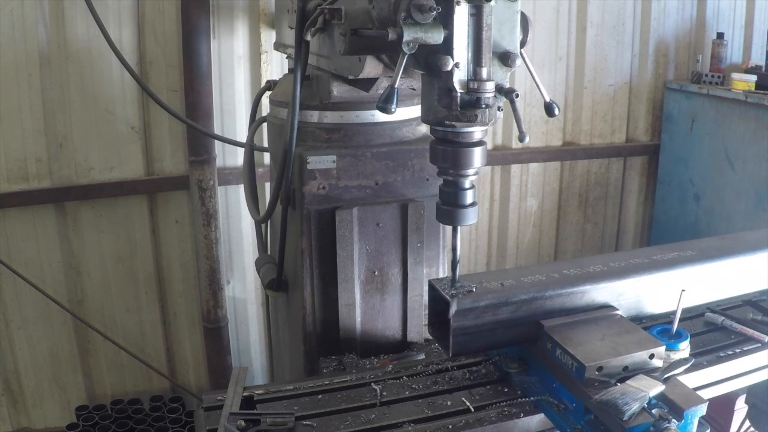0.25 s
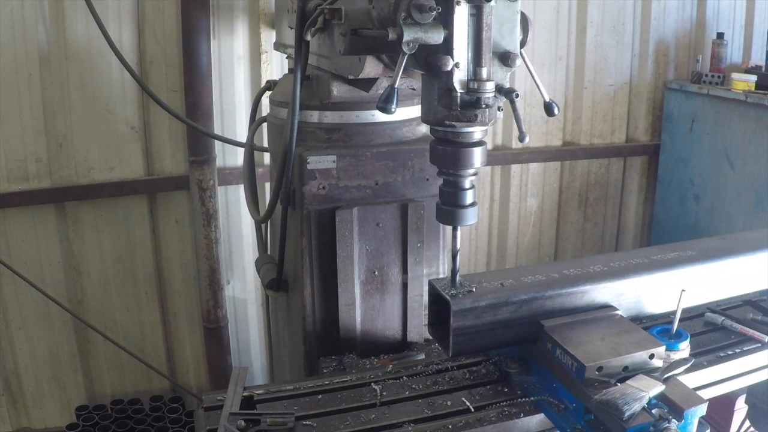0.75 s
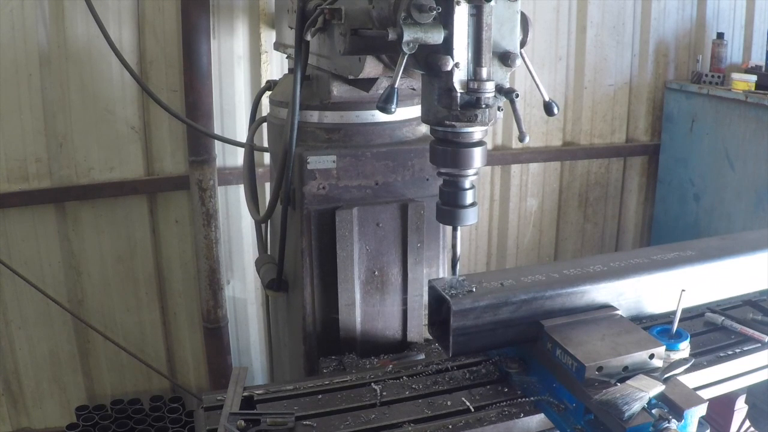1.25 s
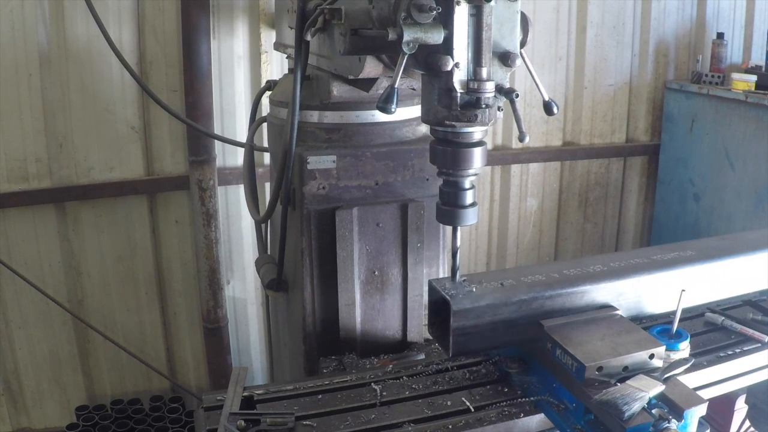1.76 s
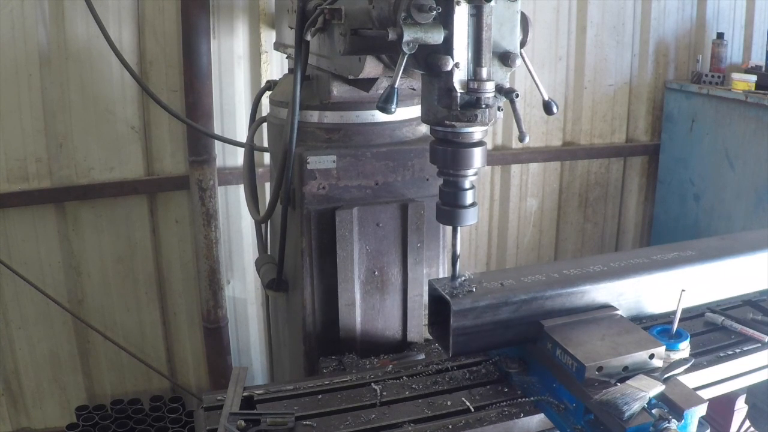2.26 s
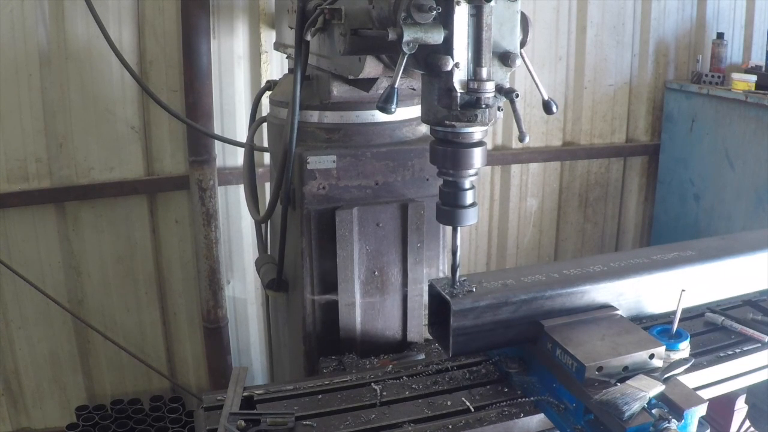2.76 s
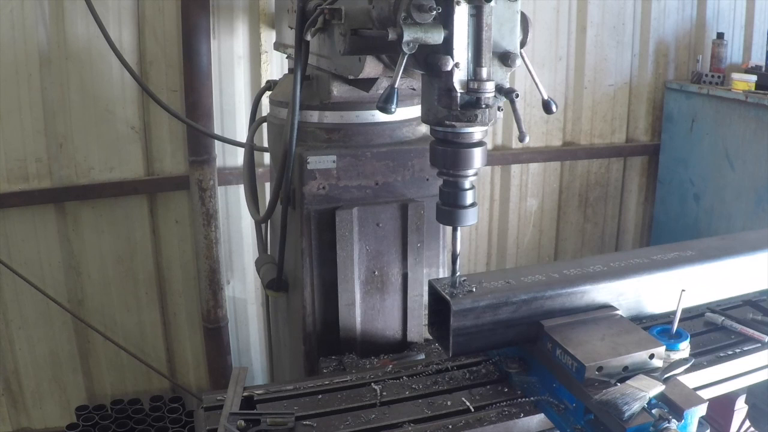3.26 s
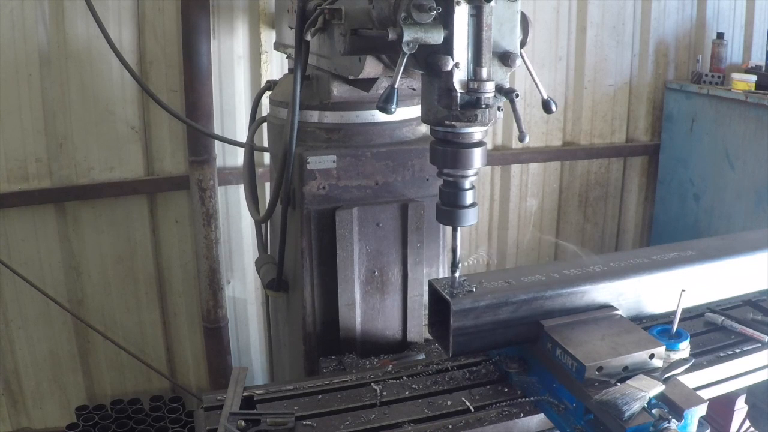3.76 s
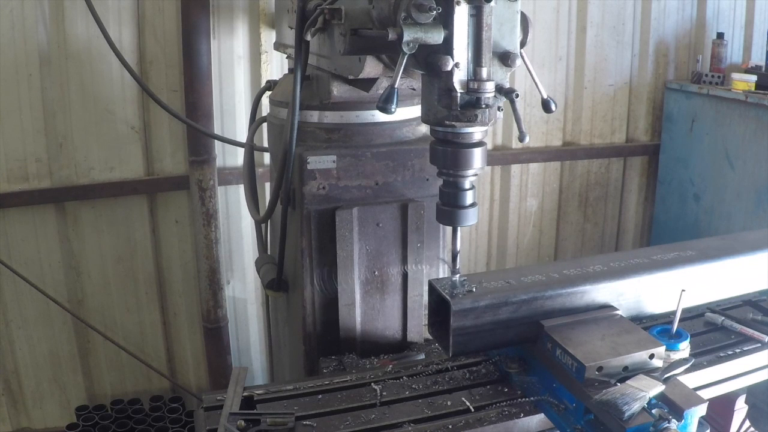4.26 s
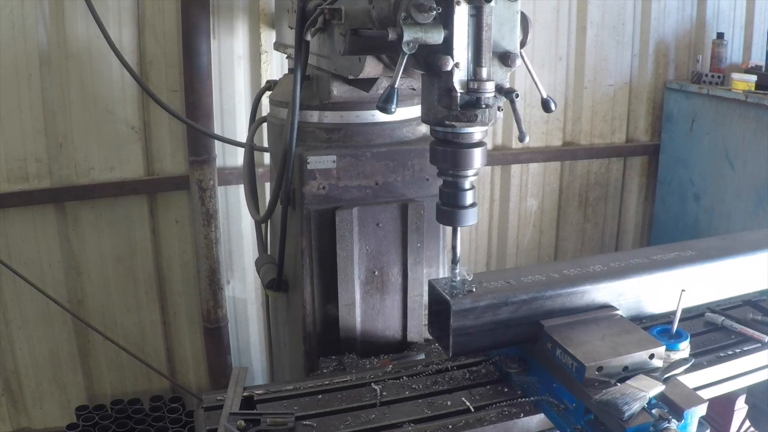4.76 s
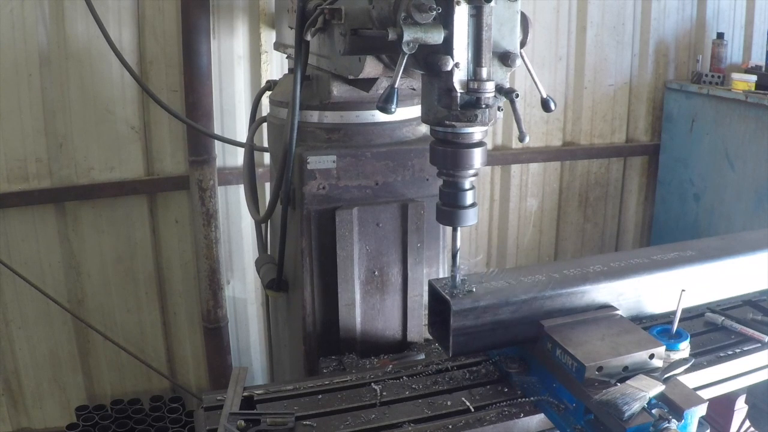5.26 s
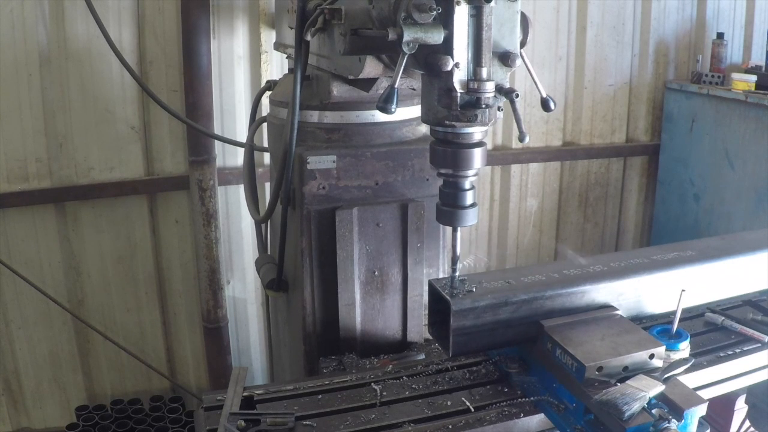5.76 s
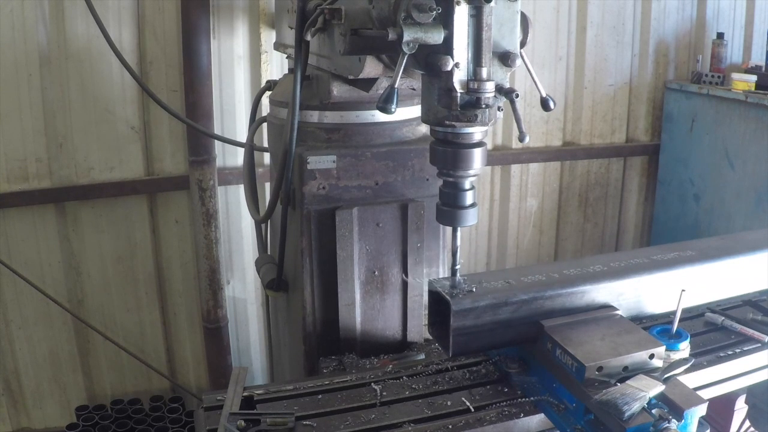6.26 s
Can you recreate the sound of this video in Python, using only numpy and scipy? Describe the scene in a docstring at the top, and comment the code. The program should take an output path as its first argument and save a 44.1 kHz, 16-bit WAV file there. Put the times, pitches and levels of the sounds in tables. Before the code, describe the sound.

A milling machine drills a steel tube with a steady, piercing gear whine over motor hum, low rumble and a faint cutting hiss.

```python
"""The gears of a milling machine whine as it drills a square steel tube: sine harmonics of the tooth rate, with
side lines from the spindle's run-out. The drill's lips hiss in the cut: shaped noise, throbbing with each turn.
Motor and a faster pulley shaft hum as stacks of sine orders; tube, covers and panels ring as resonated noise.
The castings rumble as low shaped noise. A sheet-metal shed adds short echoes to the hiss and the rumble."""
import sys
import numpy as np
from scipy import signal
from scipy.fft import rfft, irfft, next_fast_len
from scipy.io import wavfile

SR = 44100
rng = np.random.default_rng(int(sys.argv[2]) if len(sys.argv) > 2 else 0)


def file_out(sig):
    """Save sig as 16-bit WAV at sys.argv[1]."""
    # one column per channel
    cols = np.atleast_2d(sig).T
    # limit, then scale
    lim = np.clip(cols, -1, 1)
    pcm = np.round(lim * 32767).astype(np.int16)
    wavfile.write(sys.argv[1], SR, pcm)


N = 286641
TIME = np.arange(N) / SR   # s

# rumble of the castings, before its level curve: (frequency [Hz], density [dB per Hz])
RUMBLE_SPECTRUM = [(25, -64.5), (60, -60), (120, -59), (200, -56.5), (350, -56), (600, -55), (850, -54.5),
                   (1050, -52.5), (1500, -53), (1700, -58), (2000, -67.5), (2400, -72.5), (3100, -74),
                   (4000, -85)]
# level curve of the rumble: (time [s], gain [dB])
RUMBLE_GAIN = [(0.0, -1.5), (6.5, 0.5)]
# unsteady rings of tube and covers:
# (frequency [Hz], width of each filter pass [Hz], start level [dB rms], end level [dB rms])
TUBE_AND_COVER_RINGS = [(154.1, 2, -49, -49), (392.3, 2, -48, -48), (591.8, 3, -42, -39),
                        (601.6, 2, -43, -40), (696.1, 2, -45, -45), (800.8, 3, -47, -46),
                        (1131.2, 2, -46, -44), (1194.4, 2, -46, -44), (1490.2, 4, -46, -41),
                        (1507.7, 3, -40, -34), (1373.5, 2, -50, -42), (1479, 3, -50, -41),
                        (1458.2, 3, -47, -42)]
# broad panel resonances that grow or fade as the hole deepens:
# (frequency [Hz], width of each filter pass [Hz], start level [dB rms], end level [dB rms])
PANEL_RINGS = [(110, 150, -43, -49.5), (309, 70, -45.5, -39.5), (612, 100, -37, -33), (1004, 68, -28, -40),
               (1303, 46, -43.5, -45.5), (1483, 120, -37.5, -35), (2928, 240, -54, -50)]
# turning rate of the pulley shaft: (start [Hz], end [Hz])
PULLEY_RATE = (47.245, 47.32)
# pulley shaft hum, before drift: (order [multiple of shaft rate], start level [dB rms], end level [dB rms])
PULLEY_ORDERS = [(1, -52.7, -53.1), (2, -44.9, -57.7), (3, -48.9, -49.7), (4, -35.4, -33.8),
                 (5, -49.9, -44.5), (6, -37.2, -34.5), (7, -44.8, -44.2), (8, -40.3, -42.3),
                 (9, -52.0, -52.7), (10, -39.6, -38.9), (11, -41.3, -39.4), (12, -35.3, -29.6),
                 (13, -42.0, -39.6), (14, -29.0, -27.6), (15, -39.2, -38.4), (16, -44.4, -38.2),
                 (18, -37.6, -40.7), (20, -35.9, -28.7), (22, -43.8, -42.6), (23, -38.8, -40.7),
                 (32, -42.4, -36.9)]
# motor hum, before drift: (order [multiple of motor rate], level [dB rms])
MOTOR_ORDERS = [(1, -51), (2, -48), (4, -48), (6, -44), (7, -50), (8, -42), (9, -41), (11, -42)]
# colour of the cutting hiss, only its shape counts: (frequency [Hz], relative density [dB per Hz])
HISS_SPECTRUM = [(3300, -80), (3800, -80), (4100, -82), (4600, -81), (5100, -81.5), (5800, -81),
                 (6800, -86), (7300, -90.2), (7800, -92.7), (8300, -97.6), (9000, -98.3), (10000, -98.5),
                 (11300, -103.7), (15060, -105)]
# resonances in the hiss: (frequency [Hz], width [Hz], boost [dB])
HISS_RESONANCES = [(4670, 60, 3), (5700, 200, 2.5), (6200, 100, 2), (6800, 80, 3), (9630, 200, 3.5),
                   (10350, 150, 3), (10900, 200, 2.5), (14000, 300, 2)]
# the feed; the load eases as the hole deepens and the spindle speeds up a little:
# (time [s], teeth meshing per second [Hz], load on the gears [0-1])
FEED_CURVE = [(0.0, 516.57, 1.0), (2.1, 516.75, 1.0), (2.9, 516.97, .72), (3.7, 516.94, .28),
              (6.5, 517.13, 0.0)]
# gear whine: (mesh harmonic [number], unloaded level [dB rms], full-load level [dB rms], slow waver [dB])
WHINE_HARMONICS = [(1, -32.7, -32.9, .5), (2, -39.5, -31.1, 1.0), (3, -24.2, -17.8, .3),
                   (4, -48.0, -48.5, 1.5), (5, -59.0, -50.2, 1.0), (6, -55.5, -52.5, 1.8)]
# run-out of the spindle gear, before drift:
# (mesh harmonic [number], offset [spindle orders], start level [dB rms], end level [dB rms])
RUNOUT_LINES = [(1, -1, -43, -49), (1, 1, -44, -46), (2, -4, -44, -42), (2, -3, -44, -47),
                (2, -2, -32, -37), (2, 1, -39, -43), (2, 2, -39, -40), (2, 3, -50, -43), (3, -1, -42, -49),
                (3, 1, -44, -50)]
# lead of the side lines; none sways the level, a quarter sways the pitch:
# (harmonic 1 [cycles], harmonic 2 [cycles], harmonic 3 [cycles])
SIDE_LINE_LEAD = (-.27, .17, 0)

MOTOR_HZ = 29.77
MESHES_PER_TURN = 93
HIGH_SPOT_TURNS, BITE_TURNS = .77, .1   # spindle angles where the gear and the drill's lips press hardest
HISS_DB = -45.5       # rms, before throb and flutter
CUTOFF_HZ = 15250     # the top is 50 dB down from here


def from_db(db):
    """Turn decibels into an amplitude factor."""
    return 10 ** (np.asarray(db) / 20)


def rms_one(x):
    """Scale a signal to an rms of 1."""
    return x / np.sqrt(np.mean(x ** 2) + 1e-20)


def in_time(rows):
    """Draw each column of a breakpoint table as a curve over the scene."""
    seconds, *columns = np.transpose(rows)
    return [np.interp(TIME, seconds, column) for column in columns]


def glide(start, end):
    """Straight line from the first sample to the last."""
    return start + (end - start) * TIME / TIME[-1]


def drift(rate_hz):
    """Slow random wander of spread 1: coarse noise through a double one-pole low-pass."""
    step, warm_up = 40, 2000   # samples per coarse point, coarse points dropped
    pole = np.exp(-2 * np.pi * rate_hz * step / SR)
    noise = rng.standard_normal(N // step + warm_up + 2)
    slow = signal.lfilter([1], [1, -2 * pole, pole * pole], noise)[warm_up:]
    return np.interp(np.arange(N) / step, np.arange(len(slow)), rms_one(slow - slow.mean()))


def tone(turns, level_db):
    """A sine of the given rms level along a running count of cycles."""
    return np.sqrt(2) * from_db(level_db) * np.sin(2 * np.pi * turns)


def coloured_noise(spectrum, peaks=()):
    """Noise whose power per Hz follows the table, lifted around each resonance."""
    size = next_fast_len(N)
    hz = np.maximum(np.arange(size // 2 + 1) * SR / size, 1)
    table_hz, table_db = np.transpose(spectrum)
    level_db = np.interp(np.log(hz), np.log(table_hz), table_db, right=-200)
    for centre_hz, width_hz, boost_db in peaks:
        level_db = level_db + boost_db / (1 + (2 * (hz - centre_hz) / width_hz) ** 2)
    # white noise of 0 dB per Hz, then coloured
    white = rfft(rng.standard_normal(size)) * np.sqrt(SR / 2)
    return irfft(white * from_db(level_db), size)[:N]


def shed(x, wet_db):
    """A scatter of echoes off the walls puts fine ripples into the spectrum; power is kept."""
    out = x.copy()
    lags = rng.uniform(.004, .04, size=10)   # s
    signs = rng.choice([-1, 1], size=10)
    for lag, sign in zip(lags, signs):
        echo_db = wet_db - 150 * lag   # later echoes are weaker
        out += sign * from_db(echo_db) * np.roll(x, int(lag * SR))
    return out * np.std(x) / np.std(out)


def castings(bite_db):
    """Low noise of the heavy castings, swelling slightly with each bite of the drill."""
    level_db = in_time(RUMBLE_GAIN)[0] + 0.26 * bite_db
    return coloured_noise(RUMBLE_SPECTRUM) * from_db(level_db)


def rings():
    """Broad shaking picked out by resonances, each applied twice for steep skirts."""
    out = 0
    shaking = rng.standard_normal(N + SR // 2)   # the first half second lets the filters settle
    for hz, width_hz, start_db, end_db in TUBE_AND_COVER_RINGS + PANEL_RINGS:
        radius = np.exp(-np.pi * width_hz / SR)
        poles = [1, -2 * radius * np.cos(2 * np.pi * hz / SR), radius * radius]
        ring = signal.sosfilt([[1, 0, -0.982] + poles] * 2, shaking)
        out = out + from_db(glide(start_db, end_db)) * rms_one(ring[-N:])
    return out


def motor():
    """Orders of a steadily turning motor, each wavering slowly in level."""
    return sum(tone(order * MOTOR_HZ * TIME + rng.random(), db + 1.0 * drift(0.59))
               for order, db in MOTOR_ORDERS)


def pulley():
    """Orders of the faster shaft stay loosely in step, as a knock would."""
    turns = np.cumsum(glide(*PULLEY_RATE)) / SR + rng.random()
    out = 0
    for order, start_db, end_db in PULLEY_ORDERS:
        phase = -.25 + rng.normal(0, .14)   # cycles
        out = out + tone(order * turns + phase, glide(start_db, end_db) + .7 * drift(1.1))
    return out


def cut(spindle, throb_db, second_db, flutter_db, air_db):
    """The lips bite harder once and twice a turn; chips make the hiss flutter."""
    angle = 2 * np.pi * (spindle - BITE_TURNS)
    bite_db = throb_db * np.cos(angle) + second_db * np.cos(2 * angle)
    spectrum = [(2500, -110)] + list(HISS_SPECTRUM)   # fades out below the table
    hiss = rms_one(coloured_noise(spectrum, HISS_RESONANCES))
    low = signal.sosfiltfilt(signal.butter(4, 7800, fs=SR, output="sos"), hiss)
    air = (hiss - low) * from_db(air_db * drift(5.5))   # the top wavers on its own
    level_db = HISS_DB + bite_db + flutter_db * drift(7.0)
    return (low + air) * from_db(level_db), bite_db


def gears(mesh, spindle, load):
    """Harmonics of the tooth rate; side lines fall into step at the gear's high spot, so the whine warbles."""
    starts = rng.random(len(WHINE_HARMONICS))   # cycles
    out = 0
    for start, (harmonic, free_db, full_db, waver_db) in zip(starts, WHINE_HARMONICS):
        level_db = free_db + load * (full_db - free_db) + waver_db * drift(.6)
        out = out + tone(harmonic * mesh + start, level_db)
    for harmonic, side, start_db, end_db in RUNOUT_LINES:
        carrier = harmonic * mesh + starts[harmonic - 1]
        turns = carrier + SIDE_LINE_LEAD[harmonic - 1] + side * (spindle - HIGH_SPOT_TURNS)
        out = out + tone(turns, glide(start_db, end_db) + .7 * drift(.8))
    return out


def scene():
    """One feed curve drives gears and cut; hum, rings and the echoing noises join them in mono."""
    mesh_hz, load = in_time(FEED_CURVE)
    mesh = np.cumsum(mesh_hz) / SR       # running count of teeth
    spindle = mesh / MESHES_PER_TURN     # running count of turns
    hiss, bite_db = cut(spindle, throb_db=.42, second_db=.2, flutter_db=.45, air_db=.3)
    noise = shed(castings(bite_db), wet_db=-19) + shed(hiss, wet_db=-20)
    return (gears(mesh, spindle, load) + pulley() + motor() + rings() + noise)[None]


def record(dry):
    """Peaks are softly rounded, the top is cut."""
    rounded = 1.5 * np.tanh(dry / 1.5)
    return signal.sosfilt(signal.cheby2(24, 50, CUTOFF_HZ, fs=SR, output="sos"), rounded)


dry = scene()
out = record(dry)
file_out(out)
```